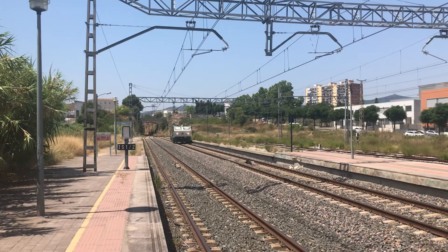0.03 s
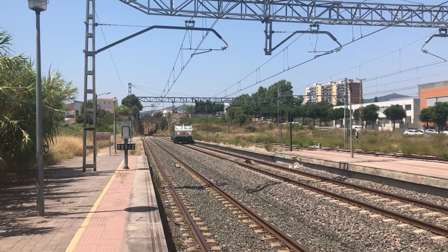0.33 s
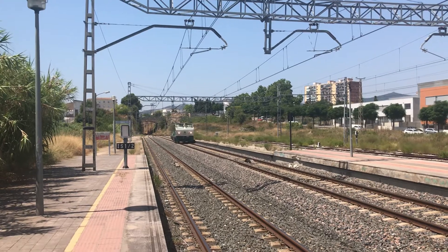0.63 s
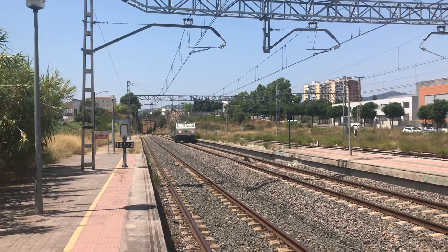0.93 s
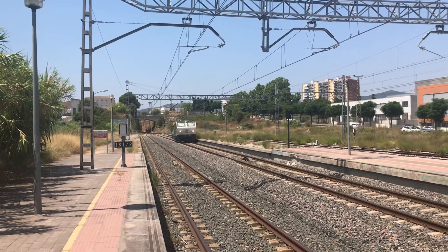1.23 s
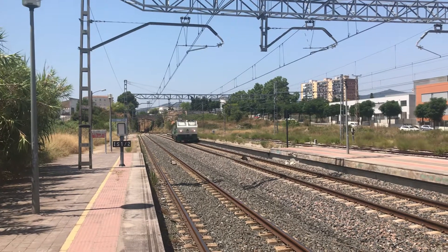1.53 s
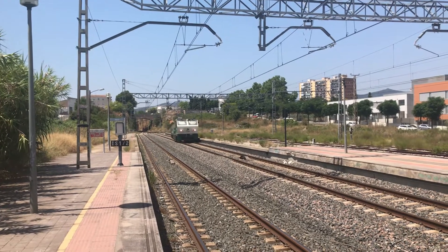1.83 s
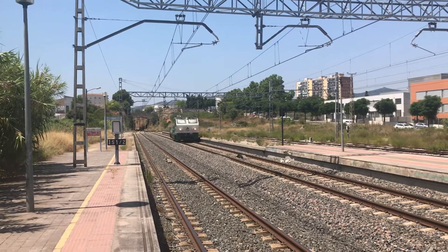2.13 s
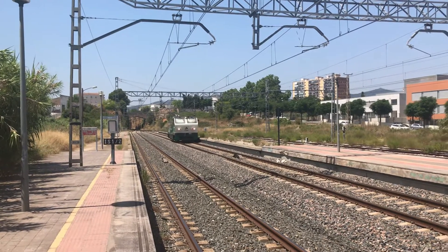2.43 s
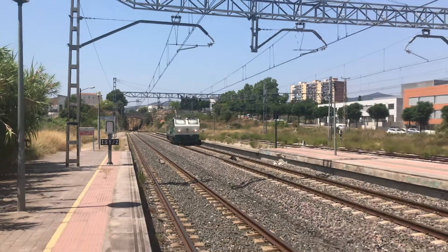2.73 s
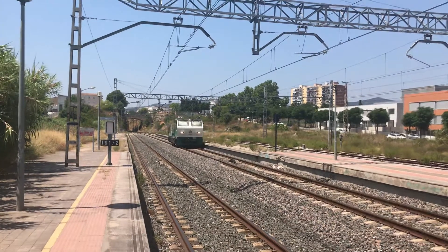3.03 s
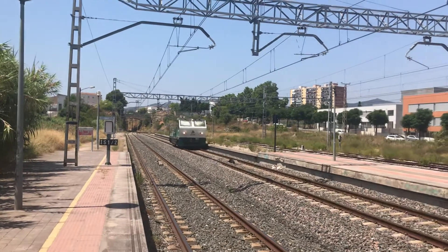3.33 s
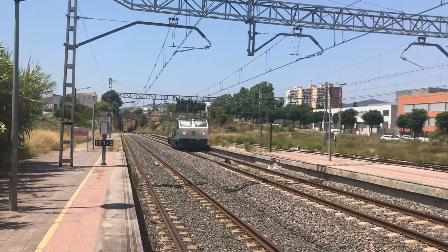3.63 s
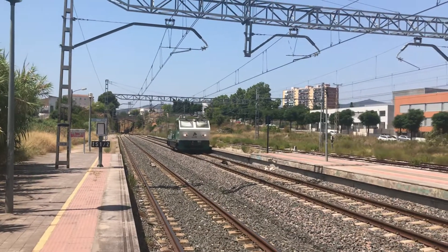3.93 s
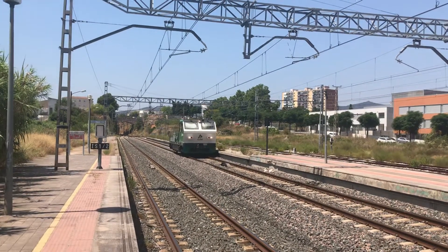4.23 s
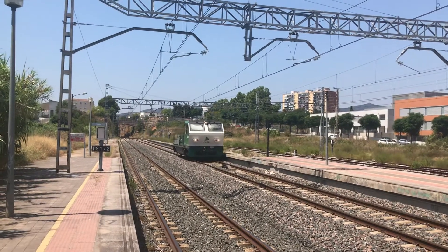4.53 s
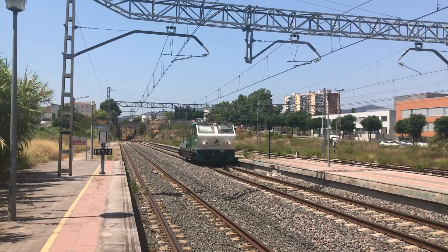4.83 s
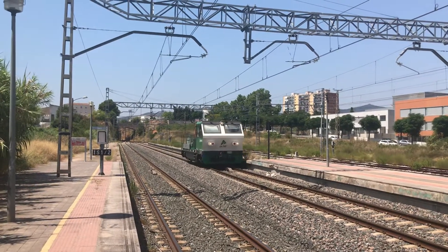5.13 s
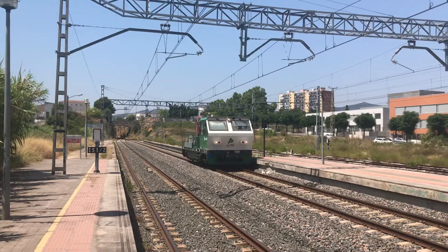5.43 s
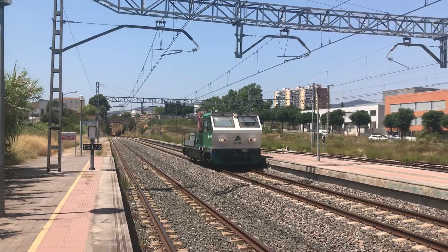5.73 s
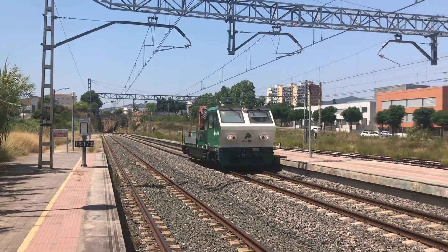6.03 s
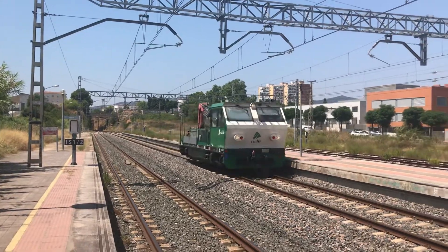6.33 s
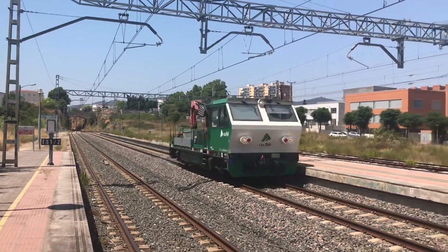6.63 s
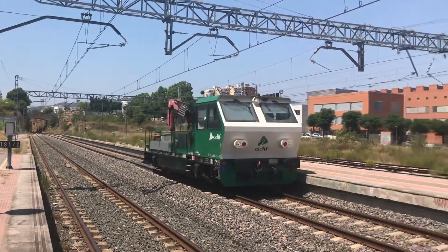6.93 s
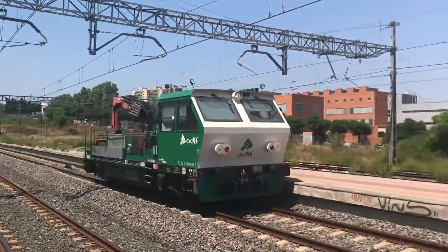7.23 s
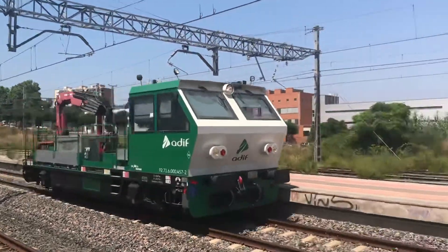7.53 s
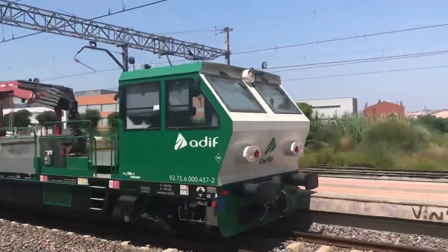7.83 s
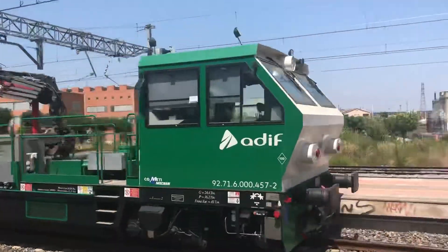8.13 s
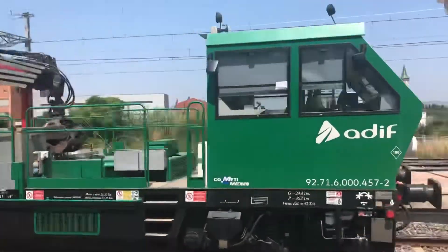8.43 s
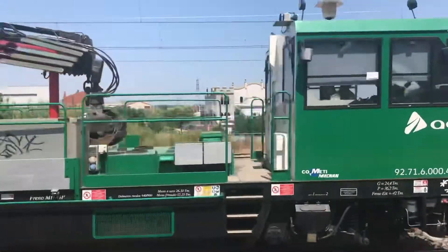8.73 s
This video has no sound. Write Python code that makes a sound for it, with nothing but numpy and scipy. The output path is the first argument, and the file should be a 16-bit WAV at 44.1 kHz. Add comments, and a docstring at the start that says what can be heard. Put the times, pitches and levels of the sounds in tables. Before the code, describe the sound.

Steel wheels hiss and roar louder as a diesel track vehicle approaches, gives one short echoing toot and rushes past with whining gears.

```python
"""A diesel track maintenance vehicle booms from far off, over a low rumble of wind and town.
Its steel wheels roar, hiss and knock on the rails, louder as it nears a station. After about five
seconds an air horn toots once, ends in a spit of air and echoes from the buildings around; a faint
whistle and a squeak follow. Then the engine throttles back, the gears whine, and machinery rushes
under the deck as the vehicle passes a few metres from the platform."""
import sys
import numpy as np
from scipy import signal
from scipy.fft import rfft, irfft, next_fast_len
from scipy.io import wavfile
from scipy.ndimage import uniform_filter1d, map_coordinates

SR = 44100
rng = np.random.default_rng(int(sys.argv[2]) if len(sys.argv) > 2 else 0)


def waveform_to_disk(signal):
    """Save audio, clipped to [-1, 1], as 16-bit WAV at the path in sys.argv[1]."""
    frames = np.transpose(np.atleast_2d(signal))
    scaled = np.clip(frames, -1, 1) * 32767
    samples = np.round(scaled).astype(np.int16)
    wavfile.write(sys.argv[1], SR, samples)


N = 391166
T = np.arange(N) / SR
SPEED_M_S, PASSES_S, TRACK_M = 11.13, 8.6, 6.03  # steady speed, moment of passing, gap to the track
HORN_S = 5.328  # the toot starts


def undb(db):
    """Turn decibels into a gain to multiply by."""
    return 10 ** (np.asarray(db) / 20)


def unit(x):
    """Scale a signal to an average strength (rms) of 1."""
    return x / np.sqrt(np.mean(x ** 2))


def colour(x, points):
    """Make some pitches louder and others softer, following (pitch_hz, gain_db) points."""
    hz, db = np.transpose(points)
    size = next_fast_len(len(x))
    bins_hz = np.maximum(np.arange(size // 2 + 1) * SR / size, 1)
    gain = undb(np.interp(np.log(bins_hz), np.log(hz), db))
    return irfft(rfft(x, size) * gain, size)[:len(x)]


def noise(points):
    """Noise of strength 1; the (pitch_hz, gain_db) points set only its tone colour."""
    return unit(colour(rng.standard_normal(N), points))


def wander(rate_hz):
    """A smooth random drift of strength 1."""
    knots = rng.standard_normal(4096)
    zigzag = np.interp(T * rate_hz, np.arange(len(knots)), knots)
    return unit(uniform_filter1d(zigzag, max(int(SR / rate_hz / 2), 1)))


def phase_of(hz):
    """The running phase, in radians, of a changing pitch."""
    return 2 * np.pi * np.cumsum(hz) / SR


def bump(at_s, half_s):
    """A bell-shaped swell of height 1."""
    return np.exp(-((T - at_s) / half_s) ** 2)


def passing_db(closest_db, fall_db, passes_s=PASSES_S, gap_m=TRACK_M):
    """The level of a source riding past: it loses fall_db each time its distance doubles."""
    distance_m = np.hypot(SPEED_M_S * (T - passes_s), gap_m)
    return closest_db - fall_db * np.log2(distance_m / gap_m)


def burst(start_s, peak_db, low_hz, high_hz, ring_s):
    """A blow: a band of noise that dies away by 60 dB in ring_s."""
    t = T[:SR // 2]
    band = signal.butter(2, [low_hz, high_hz], "band", fs=SR, output="sos")
    ring = signal.sosfilt(band, rng.standard_normal(len(t)) * undb(-60 * t / ring_s))
    return np.pad(ring * undb(peak_db) / np.abs(ring).max(), (int(start_s * SR), N))[:N]


def thin_tone(at_s, half_s, hz, glide_hz_per_s, db, multiples, waver):
    """An unsteady, gliding tone that swells and fades, made of the given multiples of hz."""
    phase = phase_of((hz + glide_hz_per_s * (T - at_s)) * (1 + waver * wander(300)))
    return np.sqrt(2) * undb(db) * bump(at_s, half_s) * sum(np.sin(k * phase) for k in multiples)


def whistle_and_squeak():
    """A faint rising whistle, then a rough, high wheel squeak."""
    squeak = thin_tone(5.88, half_s=.045, hz=2236, glide_hz_per_s=40, db=-58,
                       multiples=(3, 5, 6), waver=.012)
    whistle = thin_tone(5.715, half_s=.04, hz=1324, glide_hz_per_s=420, db=-40,
                        multiples=(1,), waver=.0054)
    return whistle + squeak


def rims():
    """The nearest wheel rims sing with a brief metallic hiss as they go by."""
    # the band the rims ring in: pitch_hz, gain_db
    rim_colour = [(4800, -30), (5400, -2), (5700, -3), (6300, -3), (7200, -30)]
    return noise(rim_colour) * bump(at_s=8.72, half_s=.28) * undb(-40 + 1.5 * wander(30))


def knocks():
    """The wheels knock dully on the track, with a few bright ticks."""
    # wheel blows: start_s, peak_db, pitch_hz
    blows = [(.4, -42.5, 1150), (1.17, -42, 1100), (1.275, -36.5, 1090), (2.669, -35, 850),
             (3.394, -37, 988), (3.479, -32.5, 950), (4.09, -36, 990), (6.23, -26.5, 262.7),
             (6.52, -25, 450), (6.825, -26.5, 740), (7.14, -24.5, 900), (7.16, -21, 351), (7.455, -21, 900),
             (7.472, -15.5, 280), (7.96, -15, 90), (8.195, -17, 503), (8.408, -15, 153), (8.589, -12, 190),
             (8.739, -11.5, 171.2)]
    # small sharp ticks: start_s, level_db (before their tone is shaped)
    ticks = [(2.668, -32), (5.03, -40), (6.17, -35)]
    tick_colour = [(1500, 6), (6000, -3), (14000, -20)]  # pitch_hz, gain_db
    dull = sum(burst(s, db, hz / 1.54, hz * 1.28, ring_s=.089) for s, db, hz in blows)
    bright = sum(colour(burst(s, db, 700, 14000, ring_s=.016), tick_colour) for s, db in ticks)
    return dull + bright


def gears():
    """Wavering gear tones beam sideways, so they swell only briefly, sinking in pitch as they pass."""
    # the tones of the drive: pitch_hz, relative_db
    whine = [(479, 0), (527, -4), (646, -5), (727, -10), (823, -3), (958, -3), (1141, -11), (1303, -11),
             (1464, -7), (1626, -9)]
    passes_s, beam_m = 8.05, 2.7
    along_m = SPEED_M_S * (T - passes_s)
    doppler = 1 - .01 * along_m / np.hypot(along_m, TRACK_M)  # higher coming, lower going
    tones = sum(undb(db + 2 * wander(16)) * np.sin(phase_of(hz * doppler * (1 + .00395 * wander(40))))
                for hz, db in whine)
    return np.sqrt(2) * undb(passing_db(-34.5, 8.9, passes_s, beam_m)) * tones


def machinery():
    """Machinery rushes under the deck; the cab screens it until the vehicle's side comes into view."""
    # the tone colour of the rush: pitch_hz, gain_db
    rush_colour = [(300, -27), (600, -4), (800, 1), (1000, 1), (1250, -6.5), (1650, -1), (2000, -10.5),
                   (2750, -28), (3400, -12.5), (4300, -12), (4950, -17), (5700, -21.5), (6700, -25.5),
                   (9000, -30)]
    screen_db, uncovered_s, fade_s = 12.5, 7.81, .06
    screened = (1 - np.tanh((T - uncovered_s) / fade_s / 2)) / 2
    db = passing_db(-27.5, fall_db=6.5, passes_s=8.49) - screen_db * screened
    return noise(rush_colour) * undb(db + .84 * wander(45))


def rumble_and_wheels(firing, near):
    """A low, nearly steady rumble of wind and town gives way to the vehicle's close rumble.
    Rough steel roars in the wheels and hisses along the rails."""
    # tone colours of the background rumble and the vehicle's close rumble: pitch_hz, gain_db
    wind_and_town, rumble_near = [(25, -31), (42, 5.5), (60, -2.5), (90, 8.5), (115, -1), (160, -11),
                                  (205, -4), (280, -8), (380, -16.5), (480, -32), (800, -50.5)], [(25, -42), (45, -16), (80, 0), (110, -3), (150, -4),
                                                      (190, 0.5), (245, 0.5), (280, -7), (315, -2.5),
                                                      (390, -8.5), (460, -20.5), (800, -43.5)]
    # tone colours of wheel roar and rail hiss, far off and close by: pitch_hz, gain_db
    roar_far, roar_near = [(200, -18), (400, -3), (600, -2), (850, -2.5), (1130, 2.5), (1400, -3),
                           (1900, -9.5), (2400, -10), (3000, -22), (5000, -55)], [(200, -5.5), (380, 1), (560, 0), (900, -5), (1200, -4),
                                             (1600, -10.5), (2000, -10.5), (2300, -7.5), (2750, -14),
                                             (3300, -20), (5000, -46)]
    hiss_far, hiss_near = [(1530, -9), (2600, -7), (3180, -2.5), (3980, 1), (4620, -5), (4910, -9),
                           (6230, -7.5), (7680, -13), (8790, -14.5), (10400, -20.5), (11800, -21),
                           (15500, -60)], [(2000, -12), (2850, -5), (3300, -0.5), (4300, -3.5),
                                             (4950, -9.5), (5650, -5.5), (6800, -7.5), (7600, -13.5),
                                             (8700, -9), (9700, -12.5), (10400, -20), (11400, -13),
                                             (13000, -17.5), (15700, -26)]
    # rougher (+) and smoother (-) stretches of rail: middle_s, half_length_s, hiss_change_db
    rail_patches = [(.55, 0.54, -4), (2.4, 0.45, 1.5), (3.45, 0.22, 1.5), (4.25, 0.36, -2),
                    (5.046, 0.33, 2.5), (6.2, 0.26, 1.5), (7.75, 0.47, -0.5)]

    def blend(far_colour, far_db, near_colour, near_db):
        """The distant sound gives way to the close one as the gap shrinks."""
        return (np.sqrt(1 - near) * noise(far_colour) * undb(far_db)
                + np.sqrt(near) * noise(near_colour) * undb(near_db))

    rough_db = sum(db * bump(s, half_s) for s, half_s, db in rail_patches)
    shake = wander(35)
    rumble = blend(wind_and_town, passing_db(-34.5, 2.16), rumble_near, passing_db(-21, 7.82))
    rumble *= undb(.22 * rough_db + 1.4 * wander(25))
    roar = blend(roar_far, passing_db(-33.5, 4.73), roar_near, passing_db(-27.5, 5.54))
    roar *= undb(.21 * rough_db + .45 * shake)
    hiss = blend(hiss_far, passing_db(-26, 9.09), hiss_near, passing_db(-33, 6.33))
    hiss *= undb(rough_db + .5 * shake + .7 * wander(400))
    ripple = 1 + .044 * np.cos(firing)  # each engine firing ripples the noise
    return rumble + ripple * (roar + hiss)


def engine():
    """The driver eases off, shuts the throttle, then gives two surges. Returns firing phase and level."""
    # the throttle over time: time_s, firing_rate_hz, close_exhaust_level_db
    throttle = [(0, 66.33, -14), (1.6, 66.4, -15), (3.1, 66.45, -12.5), (3.8, 66.1, -13),
                (4.2, 64.17, -13.5), (4.95, 62.78, -13.5), (5.7, 62.5, -14), (6.3, 62.5, -12),
                (7.47, 62.5, -15.5), (7.53, 60.2, -28), (7.75, 56.7, -25), (8.03, 57.1, -29.5),
                (8.35, 64, -51), (8.42, 69.8, -24), (8.62, 71.1, -35), (8.76, 72.9, -21.5),
                (8.87, 73.6, -33)]
    times_s, rates_hz, levels_db = np.transpose(throttle)
    firing_hz = np.interp(T, times_s, rates_hz) * (1 + .002 * wander(15))
    return phase_of(firing_hz), np.interp(T, times_s, levels_db)


def exhaust(firing, effort_db, near):
    """The silencer leaves a nearly pure boom; its overtones come up as the vehicle nears."""
    # overtones, relative to the boom: multiple_of_firing_rate, close_db, far_db
    overtones = [(2, -14, -24), (3, -26.5, -30.5), (4, -32.5, -37), (5, -32, -40), (6, -31.5, -40),
                 (7, -40, -50)]
    boom = np.sin(firing) * undb(.77 * wander(22))
    far = (1 - near) ** 3
    for k, close_db, far_db in overtones:
        gain = undb(close_db + (far_db - close_db) * far + wander(10))
        boom += gain * np.sin(k * firing + rng.uniform(0, 2 * np.pi) + .31 * wander(12))
    return np.sqrt(2) * undb(passing_db(effort_db, fall_db=3.5)) * boom


def echo(toot, delay_s, db, pitch_ratio, smear_s, overtone_db):
    """One group of buildings returns the toot late and smeared, its pitch scaled by pitch_ratio."""
    t = T[:SR // 2]
    shifted = map_coordinates(toot, [(HORN_S + t * pitch_ratio) * SR], order=1)
    reflections = rng.standard_normal(len(t)) * np.exp(-2 * t / smear_s)
    smeared = signal.fftconvolve(shifted, reflections)
    # the lowest tone and the overtones each get their own strength; a dull wall loses the top most
    low = colour(smeared, [(1000, 0), (1200, -60)])
    high = smeared - low
    high = colour(high / np.linalg.norm(high), [(1500, overtone_db), (3000, 2.2 * overtone_db)])
    returned = np.linalg.norm(shifted) * undb(db) * (low / np.linalg.norm(low) + high)
    return np.pad(returned, (int((HORN_S + delay_s) * SR), N))[:N]


def echoes(toot):
    """Near walls echo quickly, each time duller; buildings behind the vehicle add a long, lower wash."""
    walls = sum(echo(toot, delay_s=.1 + .085 * k, db=-6 - 3.5 * k, pitch_ratio=1,
                     smear_s=.015 + .004 * k, overtone_db=-4.6 - 3.6 * k) for k in range(4))
    wash = sum(echo(toot, delay_s=.074 + .18 * k, db=-24 - .43 * k, pitch_ratio=.96 + .00262 * k,
                    smear_s=.17, overtone_db=5 - 2.4 * k) for k in range(7))
    flutter = undb(2.5 * np.sin(2 * np.pi * 17 * T))  # the wash pulses 17 times a second
    # the tone colour of all the echoes: pitch_hz, gain_db
    echo_colour = [(750, 0), (1480, -5), (2200, -6.5), (2900, -5), (4400, -9), (6000, -3), (12000, 0)]
    return colour(walls + flutter * wash, echo_colour)


def horn():
    """Air buzzes a reed, then spits past it as the valve shuts. Returns the toot and the spit of air."""
    # the reed's tones: multiple_of_pitch, relative_db (before brightening)
    reed_tones = [(1, -0.5), (2, -3.5), (3, -18), (4, -21), (5, -27), (6, -35), (7, -41), (8, -28.5),
                  (9, -41), (10, -43), (11, -46), (12, -42), (13, -42)]
    # the tone colour of escaping air: pitch_hz, gain_db
    air_colour = [(500, -30), (1200, 9.5), (1800, -9), (2400, -5), (3700, 8.5), (4400, 7.5), (5200, -10),
                  (7000, -3), (8200, 4), (9400, 8.5), (10400, -6), (12500, -1), (15700, -12)]
    attack_s, hold_s, release_db_per_s, spit_s = .023, .108, 649, 5.451
    pitch_hz, sharp_hz, settle_s, sag_hz_per_s = 746, 26.2, .0047, 65
    held_s = T - HORN_S - attack_s
    opening = np.minimum(held_s / attack_s, 0)  # climbs from -1 to 0 as the toot starts
    blown_s = held_s.clip(0, hold_s)
    db = -12 + 33 * opening - release_db_per_s * np.maximum(held_s - hold_s, 0)
    db -= 10.5 * bump(at_s=5.445, half_s=.006)  # the spit chokes the reed for an instant
    # the reed starts sharp, settles, then sags as the pressure drops
    hz = pitch_hz + sharp_hz * (1 - np.tanh(held_s / settle_s + 1)) / 2 - sag_hz_per_s * blown_s
    spit = undb(np.minimum(440 * (T - spit_s), 560 * (spit_s - T)))  # rise and fall in dB a second
    # the overtones speak late, grow through the hold and flare with the spit
    bright_db = -5.5 + 26 * opening + 37 * blown_s + 13.5 * spit
    phase = phase_of(hz * (1 + (.0012 + .007 * spit) * wander(400)))
    tone = np.zeros(N)
    for k, level_db in reed_tones:
        bright_share = min((k - 1) / 2, 1)
        tone += undb(level_db + bright_db * bright_share + .55 * spit * wander(350)) * np.sin(k * phase)
    toot = (T > HORN_S) * np.sqrt(2) * undb(db) * tone
    air = undb(-23.5) * spit * noise(air_colour)
    return toot, air


def scene():
    """The background rumble, the approaching vehicle, its horn and the echoes, in one channel."""
    firing, effort_db = engine()
    near = np.interp(T, [2.8, 5, 7.3], [0, .45, 1])  # 0 far off, 1 close by
    toot, air = horn()
    approach = exhaust(firing, effort_db, near) + rumble_and_wheels(firing, near)
    approach += gears() + machinery() + rims() + knocks()
    return (approach + toot + air + echoes(toot) + whistle_and_squeak())[None]


def record(dry):
    """Cut away the highest treble, above 15700 Hz."""
    return signal.sosfilt(signal.ellip(10, .2, 80, 15700, fs=SR, output="sos"), dry)


dry = scene()
out = record(dry)
waveform_to_disk(out)
```